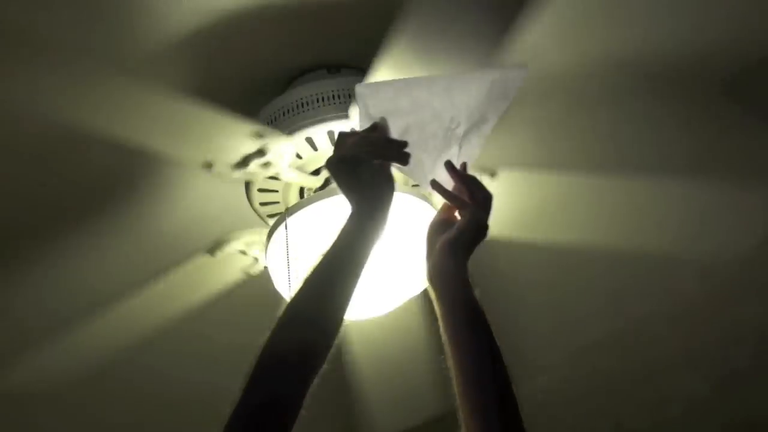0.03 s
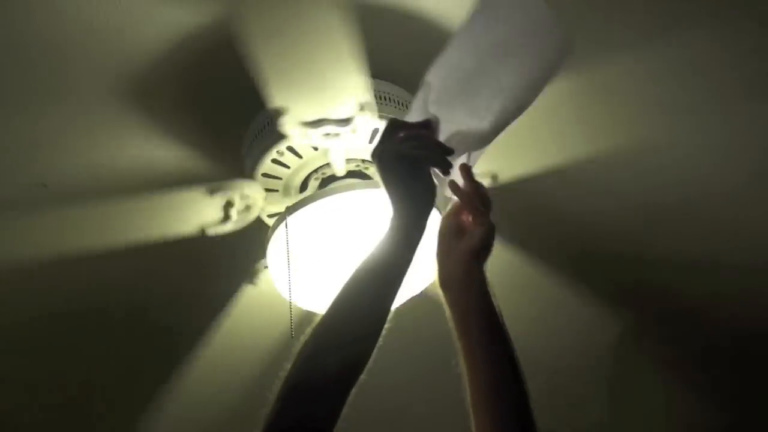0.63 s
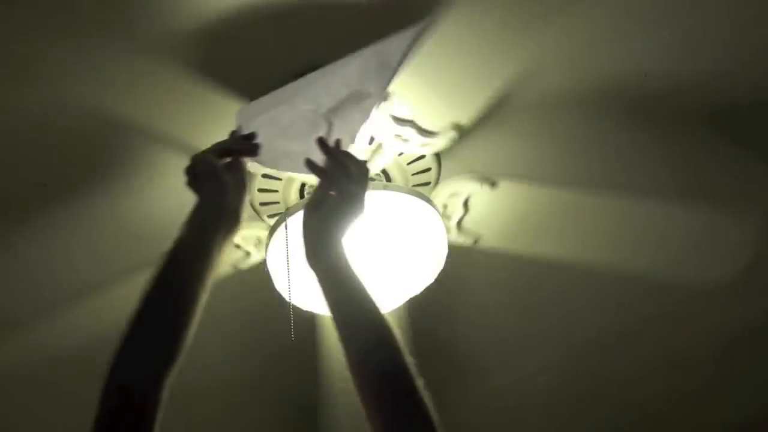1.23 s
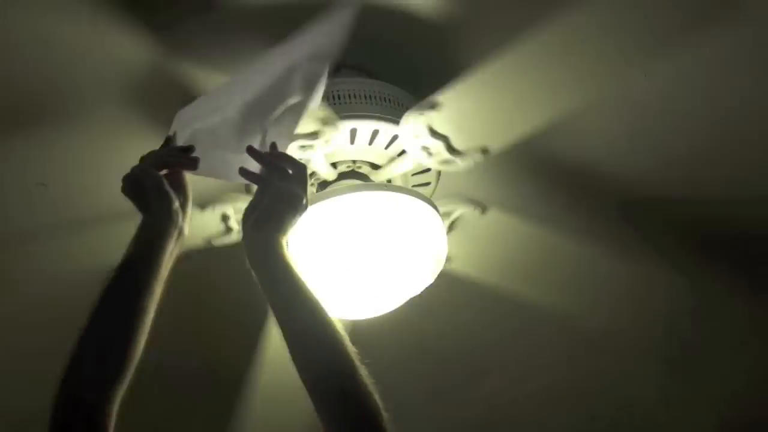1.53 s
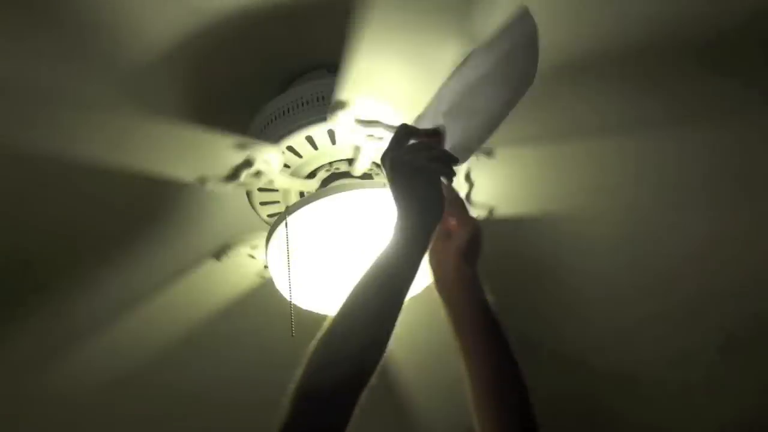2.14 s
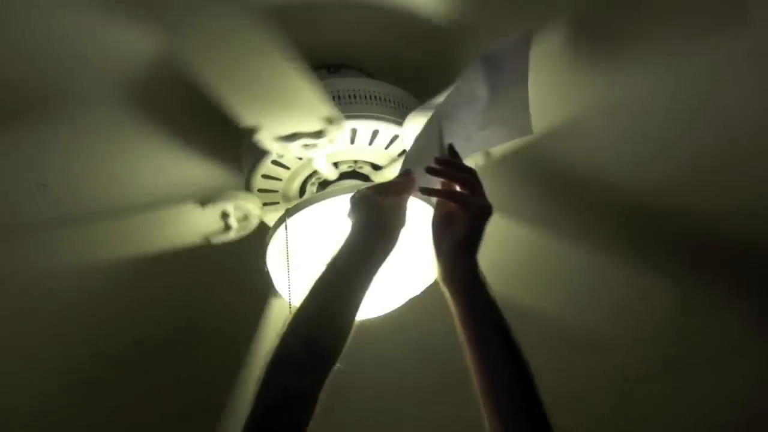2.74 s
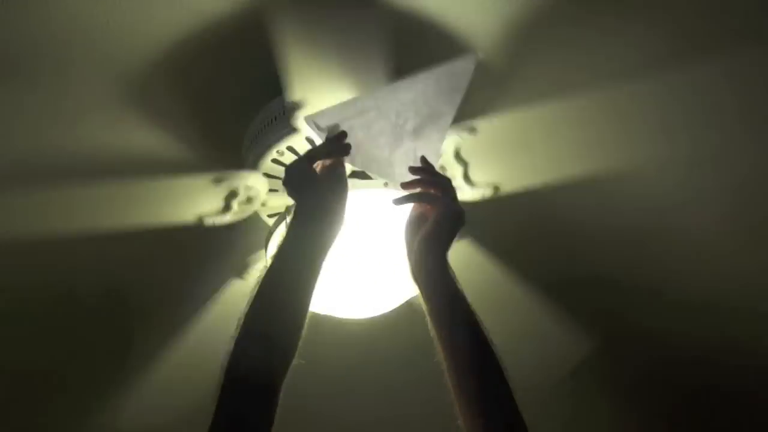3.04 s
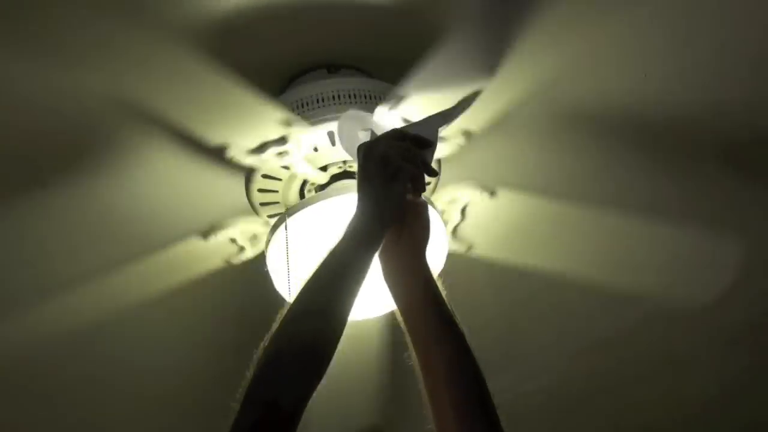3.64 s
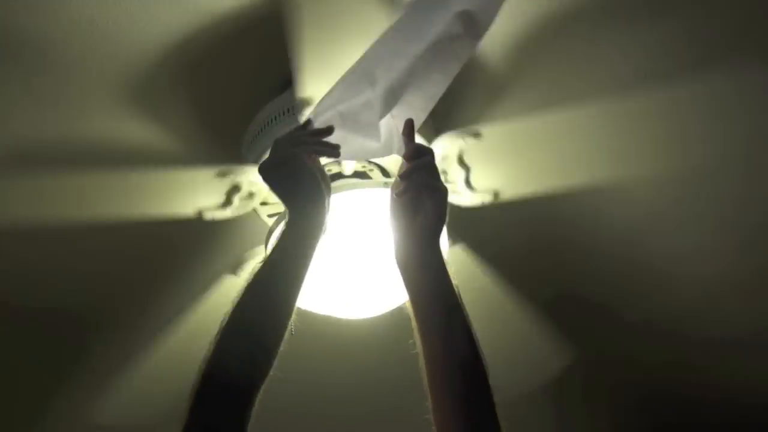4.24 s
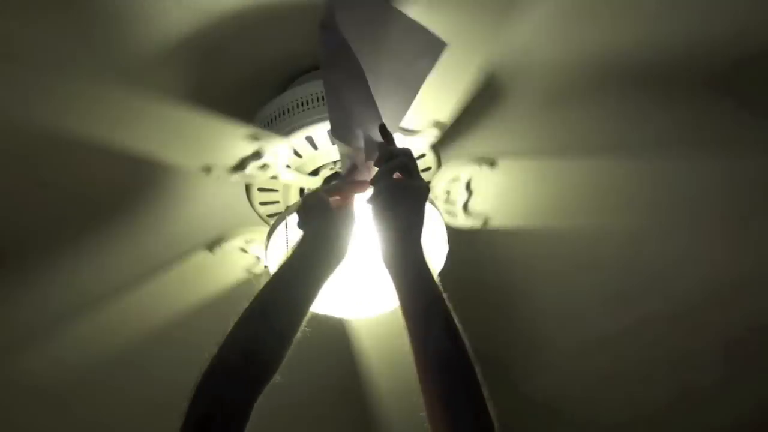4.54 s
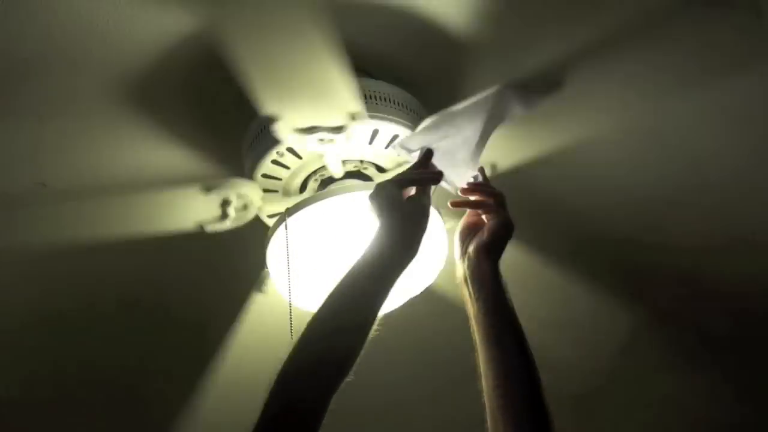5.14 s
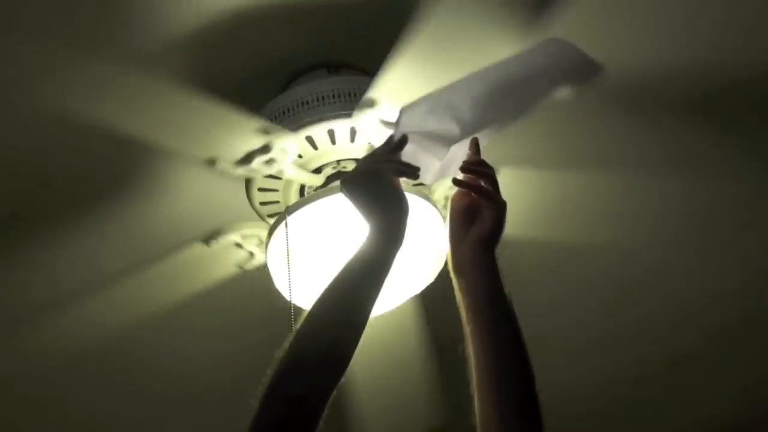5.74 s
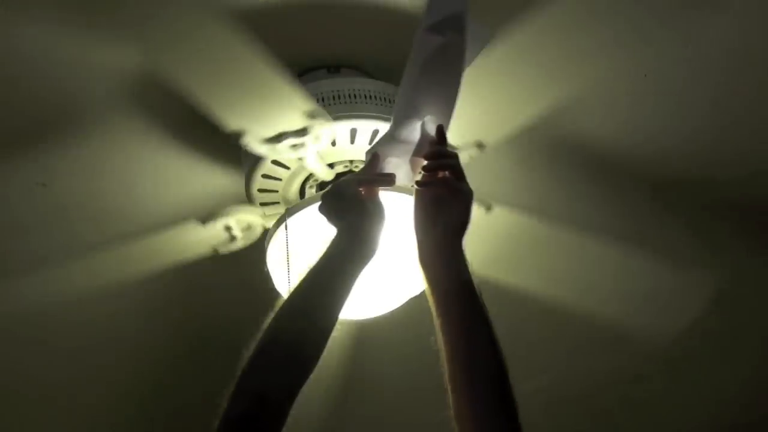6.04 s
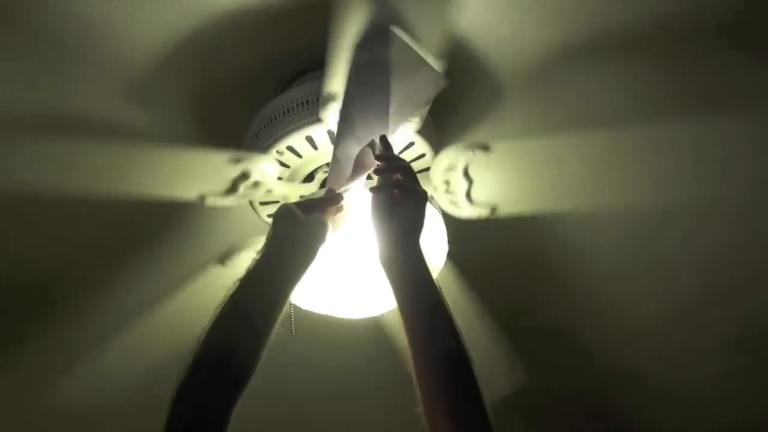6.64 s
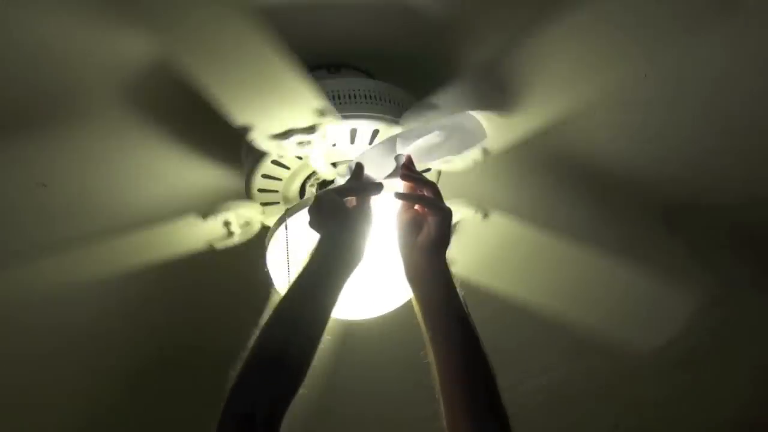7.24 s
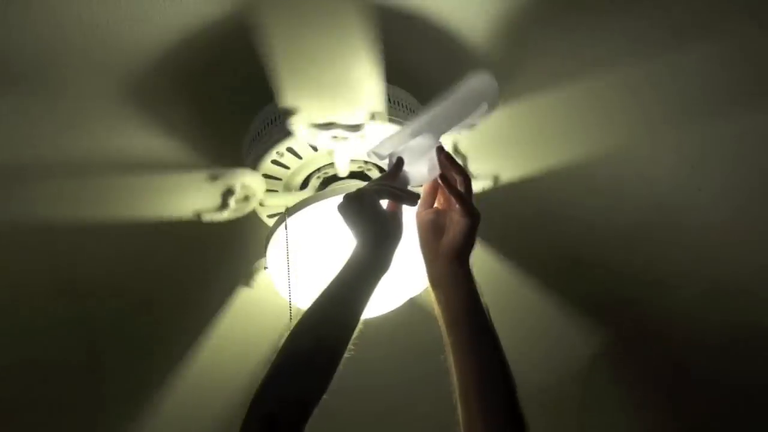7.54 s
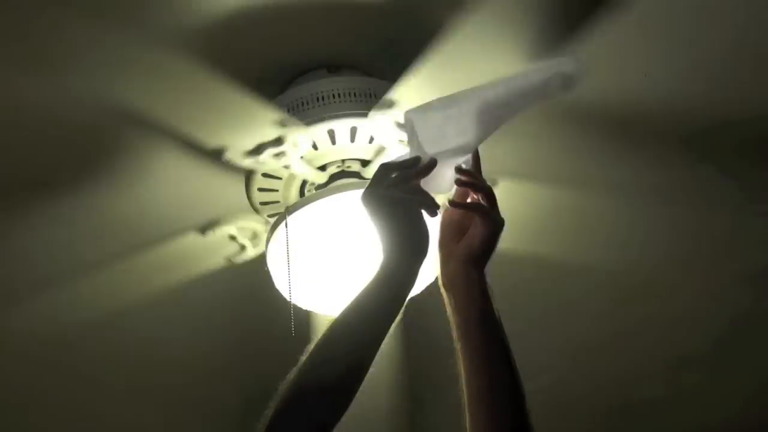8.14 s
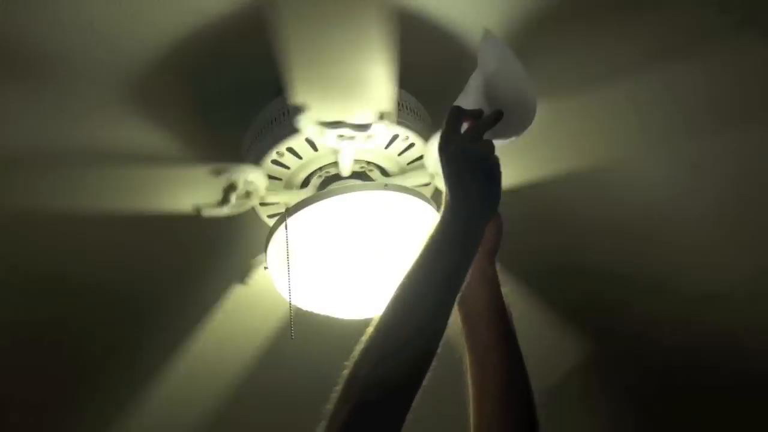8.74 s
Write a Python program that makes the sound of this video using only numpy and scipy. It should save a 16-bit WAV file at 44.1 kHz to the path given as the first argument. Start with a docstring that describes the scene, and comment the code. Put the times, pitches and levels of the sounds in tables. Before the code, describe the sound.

The blades of a spinning ceiling fan strike a sheet of paper four or five times a second. The sheet cracks, crackles and snaps free in an uneven clatter, sometimes rustling as it drags along the blades. Each slap is close and centred, with a short, bright echo from a small, bare room. A faint motor hum and soft wash of air lie underneath.

```python
"""A small, bare room, where a sheet of paper is held up into a spinning ceiling fan.
Four or five times a second a blade strikes it: the sheet cracks, buckles in a burst of crackles
and snaps free, or stays on the blades for a while and rustles. The microphone hears the nearest
patch of paper directly, dead centre; the room answers each slap with a short, bright, wider tail.
Underneath lie the low hum of the motor and the wash of air off the blades."""
import sys
import numpy as np
from scipy import signal
from scipy.fft import rfft, irfft, next_fast_len
from scipy.io import wavfile

SR = 44100
rng = np.random.default_rng(int(sys.argv[2]) if len(sys.argv) > 2 else 0)


def transcribe(u):
    """Save the signal u as a 16-bit wav file named by the first command-line argument.

    u: samples, shape (n,) or (channels, n), limited to [-1, 1]; the rate is SR.
    q: integer samples, one column per channel.
    """
    v = np.clip(np.atleast_2d(u).T, -1, 1)
    q = np.round(v * 32767).astype(np.int16)
    wavfile.write(sys.argv[1], SR, q)


N = 391608

# The fan motor's hum. Each row: frequency in Hz, rms level in dB that it wavers around.
MOTOR_HUM = [(48.4, -63.5), (60, -74), (134.6, -66.5)]
# Air moved by the blades. Each row: frequency in Hz, relative level in dB.
AIR_COLOUR = [(20, -22), (48, 2), (80, -2), (140, 2.5), (300, -1), (1000, -4.5), (3000, -4.5),
              (8000, -10.5), (16000, -21)]
# The part of that air which differs left to right. Each row: frequency in Hz, relative level in dB.
AIR_SIDE_COLOUR = [(20, -10), (60, -14), (150, -8), (1000, -2), (4000, -11), (16000, -41)]
# The bare room's decay. Each row: frequency in Hz, seconds to fall by 60 dB.
ROOM_DECAY = [(150, 0.41), (400, 0.4), (1000, 0.34), (2800, 0.34), (7300, 0.35), (14000, 0.29)]
# Width of the room sound at the microphone. Each row: frequency in Hz, side minus mid in dB.
ROOM_WIDTH = [(150, -22.5), (600, -14.5), (1500, -10), (3000, -9), (7200, -23), (10000, -5), (11200, -4),
              (11800, -40)]
# Colour of the crackling sheet. Each row: frequency in Hz, relative level in dB.
PAPER_COLOUR = [(50, -25), (100, -33.5), (160, -15.5), (240, -10.5), (300, -14), (370, -10), (1000, -1),
                (2100, 1.5), (4700, 0.5), (6800, -2), (9700, -11.5), (11800, -11), (14000, -20.5),
                (16000, -52)]
# Ring of the blades under a blow. Each row: frequency in Hz, bandwidth in Hz, relative level in dB.
BLADE_MODES = [(239, 7.9, -20), (375.5, 22, 0), (713, 18, -20), (1050, 6.9, -16), (1455, 9.4, -2),
               (2110, 27, -18), (2520, 15, -10)]
# The whole sheet flopping over. Each row: start in seconds, relative level in dB, pitch in Hz.
SHEET_FLOPS = [(0.787, -32, 200), (0.87, -30, 175), (0.909, -39, 205), (1.3, -34, 150), (1.325, -30, 175),
               (1.936, -33, 186), (2.115, -33, 180), (2.952, -35, 250), (3.584, -32, 190),
               (4.089, -39, 185), (5.08, -31, 223), (6.883, -29, 245)]
# Creases popping over. Each row: start in seconds, relative level in dB.
CREASE_POPS = [(1.5406, -21), (3.2813, -26.5), (3.428, -27), (4.109, -21.5), (4.3048, -21.5),
               (7.545, -29.5)]
# The sheet riding the blades. Each row: start and end in seconds, relative level in dB, treble in dB.
SHEET_DRAGS = [(0, 0.012, -30.5, -5), (0.184, 0.426, -42.5, 9), (0.466, 0.61, -52, -4),
               (0.851, 0.91, -32.5, 4), (1.424, 1.606, -42.5, 8.5), (1.6, 1.822, -40, 12),
               (1.871, 1.934, -36.5, -2), (2.132, 2.216, -48.5, 1), (2.989, 3.077, -41.5, 11),
               (3.149, 3.338, -34.5, 4), (3.48, 3.73, -35, -11), (3.848, 4.094, -45, -12),
               (4.139, 4.189, -28.5, 2.5), (4.87, 5.0, -34.5, 2.5), (5.13, 5.449, -36.5, 5.5),
               (5.479, 5.61, -43, 1), (6.726, 6.793, -35, 1), (6.992, 7.128, -35, 1),
               (7.222, 7.388, -37.5, 0), (7.425, 7.645, -42, 9.5), (7.749, 7.816, -33.5, 0),
               (7.895, 7.94, -41.5, 0), (8.048, 8.112, -37, 2), (8.256, 8.416, -39.5, -0.5)]
# A blade strikes the sheet and pushes it along until it snaps free of the trailing edge.
# Each row: start in seconds, strike level in dB, contact time in seconds, release level in dB,
# treble in dB, first crack in dB over the strike (low for a glancing blow). Levels are relative.
BLADE_BLOWS = [(0.0767, -21.5, 0.014, -21, 4, -5), (0.2453, -21.5, 0.089, -23, -8.5, -23.5),
               (0.427, -26, 0.012, -33, -3, -1), (0.5167, -32.5, 0.0084, -33, -12, 1.5),
               (0.6109, -17, 0.063, -22.5, -6.5, -16), (0.7873, -14.5, 0.018, -20.5, 4.5, -9.5),
               (0.983, -15, .063, -11.5, 2, -11.5), (1.207, -22, .012, -27, 4.5, -12),
               (1.3898, -27, 0.021, -34, 4.5, -16), (1.539, -17.5, 0.025, -19, -1, -19),
               (1.926, -21.5, 0.016, -16, 1.5, -22), (2.096, -33.5, .01, -44, -16, -8),
               (2.2398, -14.5, 0.063, -14, 5.5, -14.5), (2.4533, -18.5, 0.031, -16, -3, -11),
               (2.7461, -16, .01, -21, 4, -7.5), (2.9503, -15.5, .013, -21.5, -7, -10),
               (3.135, -19, .008, -25, -5, -11), (3.2708, -24.5, 0.0098, -30, -14, -7),
               (3.356, -27.5, .01, -34, -4, -9), (3.3815, -17.5, 0.042, -15.5, -3, -13),
               (3.568, -23, .034, -22.5, -6.5, -6), (3.694, -26, 0.014, -33.5, -5.5, -4),
               (3.8977, -27.5, 0.0095, -27, -1, -2), (3.964, -47, 0.011, -33.5, 0.5, 10.5),
               (4.0847, -18, 0.021, -19, 2.5, -1.5), (4.3054, -24, 0.032, -42, -0.5, -15),
               (4.5557, -20, 0.0073, -21, -2.5, -12), (4.775, -20, 0.023, -21, -3, -36),
               (5.0062, -30, 0.0074, -44, -37, -2), (5.073, -18, 0.042, -45, -4, -3.5),
               (5.2781, -18.5, 0.031, -15.5, -4.5, -20), (5.454, -24, .008, -36, -11, -9),
               (5.601, -21, .032, -14, -1.5, -16), (5.761, -16.5, 0.013, -26, -3.5, -7.5),
               (5.821, -18, .01, -26, -5.5, -10), (6.029, -28, 0.0096, -36, 0, -7),
               (6.424, -15.5, 0.024, -15.5, 3, -6.5), (6.6456, -18, 0.017, -29, -1.5, -13),
               (6.7963, -35.5, .008, -38, -9, 4), (6.843, -25.5, 0.007, -35, -14, -4),
               (6.8793, -16.5, .009, -21.5, 1, -5.5), (7.1676, -17.5, .055, -41, -3.5, -4),
               (7.379, -22.5, 0.037, -20, -16, -9), (7.545, -28, 0.0063, -33, 7, -6),
               (7.66, -16.5, 0.011, -24.5, -1.5, -8), (7.9332, -22, 0.026, -38, 2, -2.5),
               (8.1551, -19, 0.0078, -22.5, 5, -2), (8.315, -37, .006, -44, -24, -3),
               (8.403, -29, 0.0044, -36, -6, -3.5), (8.44, -22, 0.017, -18.5, -1.5, -20),
               (8.6605, -18, 0.047, -16.5, 1, -13)]

AIR_DB, AIR_SIDE_DB = -51, -7.5  # rms level of the air; its side signal against that
STRIKE_BODY_DB, RELEASE_BODY_DB = 2.5, -0.5  # the blade behind the sheet gives the strike more body
STRIKE_DIRECT_DB, RELEASE_DIRECT_DB = -5.5, -5  # direct sound against the room
STRIKE_SHARE, LONGEST_FADE_S = 0.43, 0.018  # a strike fades in this share of the contact, up to a limit
SQUARE_RISE_S, GLANCE = 0.00032, 1.27  # a square blow's rise; the fainter its crack, the slower the rise
CRACK_RISE_S, CRACK_FADE_S = 0.0004, 0.0045
RELEASE_RISE_S, RELEASE_FADE_S = 0.0014, 0.0038


def gain_of(db):
    return 10 ** (np.asarray(db) / 20)


def unit_rms(x):
    return x / np.sqrt(np.mean(x ** 2) + 1e-20)


def value_at(points, hz):
    """Reads a table along straight lines over log frequency."""
    table_hz, value = np.transpose(points)
    return np.interp(np.log(hz + 1), np.log(table_hz + 1), value)


def add(mix, start_s, sound):
    part = mix[max(round(start_s * SR), 0):][:len(sound)]
    part += sound[:len(part)]


def tint(x, points):
    """Colours a sound by rows of frequency in Hz and gain in dB."""
    size = next_fast_len(len(x) + 512)
    gain = gain_of(value_at(points, np.fft.rfftfreq(size, 1 / SR)))
    return irfft(rfft(x, size) * gain, size)[:len(x)]


def air_wash(db, colour):
    """The soft, steady noise of air stirred by the blades."""
    return gain_of(db) * unit_rms(tint(rng.standard_normal(N), colour))


def motor_hum(beat_s=2.12, trough_s=0.2, beat_db=3.5):
    """The motor overhead: wavering low tones, the lowest swelling and sinking in a slow beat."""
    t = np.arange(N) / SR
    knots = np.linspace(0, t[-1], 40)
    tones = []
    for hz, db in MOTOR_HUM:
        waver = np.interp(t, knots, rng.standard_normal(len(knots)))
        tones.append(np.sqrt(2) * gain_of(db + 1.5 * waver) * np.sin(2 * np.pi * hz * t + 0.4 * waver))
    beat = gain_of(-beat_db * np.cos(2 * np.pi * (t - trough_s) / beat_s))
    return beat * tones[0] + sum(tones[1:])


def room_tail(ceiling_s=0.0016, echoes_per_s=9000):
    """The near ceiling answers first, then the walls: random echoes, each band dying at its own speed."""
    t = np.arange(SR * 2 // 3) / SR
    echoes = rng.standard_normal(len(t)) * (rng.random(len(t)) < echoes_per_s / SR)
    hz, age, bands = signal.stft(echoes * (t > ceiling_s), SR, nperseg=256)
    decay = gain_of(-60 * age / value_at(ROOM_DECAY, hz)[:, None])
    tail = signal.istft(bands * decay, SR, nperseg=256)[1]
    return tail / np.linalg.norm(tail)


def flop_puffs(swell_s=0.0039, trim_db=-3):
    """A few low cycles of air pushed out by the flopping sheet."""
    out, t = np.zeros(N), np.arange(SR // 10) / SR
    envelope = t / swell_s * np.exp(1 - t / swell_s)
    for start, db, hz in SHEET_FLOPS:
        add(out, start, gain_of(db + trim_db) * envelope * np.sin(2 * np.pi * hz * t))
    return out


def crease_ticks(fade_s=0.00094, wall_delay_s=0.0053, wall_db=-7, trim_db=-2):
    """A crease pops: a thin, bright tick reaches the microphone, then its echo off the nearest wall."""
    out, t = np.zeros(N), np.arange(SR // 200) / SR
    for start, db in CREASE_POPS:
        tick = rng.standard_normal(len(t)) * np.exp(-t / fade_s)
        tick *= gain_of(db + trim_db) * np.sqrt(0.02 * SR) / np.linalg.norm(tick)
        add(out, start, tick)
        add(out, start + wall_delay_s, gain_of(wall_db) * tick)
    return tint(out, [(700, -2), (2500, -9.5), (6000, 1.5), (12000, 2)])


def sheet_ring(x):
    """Every click rings with the colour of the paper and, faintly, the modes of the blade."""
    hz = np.fft.rfftfreq(8192, 1 / SR)
    log_gain = np.log(gain_of(value_at(PAPER_COLOUR, hz)))
    mirrored = np.r_[log_gain, log_gain[-2:0:-1]]
    paper = np.exp(signal.hilbert(mirrored).conj())[:len(hz)]  # causal: no ring before the click
    blade = 1 + sum(gain_of(db) / (1 + 2j * (hz - mode_hz) / width) for mode_hz, width, db in BLADE_MODES)
    click = irfft(paper * blade)
    return signal.oaconvolve(x, click / np.linalg.norm(click))[:N]


def sheet_grip(catches_per_s=80, spread_db=3):
    """A juddering gain: the sheet catches on the blade and lets go."""
    catches = rng.standard_normal(catches_per_s * N // SR)
    position = np.linspace(0, len(catches), N)
    return unit_rms(gain_of(spread_db * np.interp(position, np.arange(len(catches)), catches)))


def crackle(samples, per_s, spread_db, hiss):
    """Tiny buckling clicks of uneven size over the hiss of rubbing fibres."""
    size = gain_of(spread_db * np.minimum(rng.exponential(1, samples), 4))
    clicks = size * rng.choice([-1, 1], samples) * (rng.random(samples) < per_s / SR)
    return unit_rms(clicks) + hiss * rng.standard_normal(samples)


def drag_rustle(grip, edge_s=0.0017, sag_db_per_s=9):
    """Loose crackles that swell and sink as the sheet catches and slides along a blade."""
    out = np.zeros(N)
    for start, end, db, treble_db in SHEET_DRAGS:
        t = np.arange(0, max(end - start, 2 * edge_s), 1 / SR)
        rustle = crackle(len(t), per_s=1200, spread_db=4, hiss=0.35)
        rustle *= np.clip(np.minimum(t, t[-1] - t) / edge_s, 0, 1)
        rustle *= gain_of(-sag_db_per_s * (t - t.mean()))  # sinks as the sheet slips off
        colour = [(400, 2.7), (1200, 1.5), (3300, -3), (8500, treble_db), (12000, treble_db + 3)]
        add(out, start, gain_of(db) * tint(rustle, colour))
    return out * grip


def slap(db, rise_s, fade_s, body_db, treble_db, bend_db, grip, judder=1.3):
    """A dense burst of crackles, clumped as the sheet catches and coloured by how it is bent."""
    t = np.arange(min(int((8 * fade_s + 0.005) * SR), len(grip))) / SR
    envelope = np.exp(-t / (2 * fade_s)) * (1 - np.exp(-t / rise_s))
    burst = crackle(len(t), per_s=6000, spread_db=3, hiss=0.67) * envelope * grip[:len(t)] ** judder
    burst *= np.sqrt(0.02 * SR / np.sum(burst ** 2))  # long or short, the energy of 20 ms at unit rms
    hz = np.geomspace(300, 12000, len(bend_db))
    colour_db = value_at([(600, body_db), (1400, 0), (3300, 0), (9500, treble_db)], hz) + bend_db
    return gain_of(db) * tint(burst, np.c_[hz, colour_db])


def edge_cracks(bends, grip):
    """The short, dry crack as a blade's leading edge first meets the sheet."""
    out = np.zeros(N)
    for (start, strike_db, _, _, treble_db, crack_db), bend_db in zip(BLADE_BLOWS, bends):
        crack = slap(strike_db + crack_db, CRACK_RISE_S, CRACK_FADE_S, STRIKE_BODY_DB,
                     treble_db, bend_db, grip[round(start * SR):])
        add(out, start - CRACK_RISE_S, crack)
    return out


def blade_slaps(bends, grip):
    """Each blow slaps twice, at strike and release; returns the direct sound and what fills the room."""
    direct, into_room = np.zeros((2, N))
    for (start, strike_db, contact_s, release_db, treble_db, crack_db), bend_db in zip(BLADE_BLOWS, bends):
        rise_s = SQUARE_RISE_S * gain_of(-GLANCE * crack_db)
        fade_s = min(STRIKE_SHARE * contact_s, LONGEST_FADE_S)
        catching = grip[round(start * SR):]
        strike = slap(strike_db, rise_s, fade_s, STRIKE_BODY_DB, treble_db, bend_db, catching)
        release = slap(release_db, RELEASE_RISE_S, RELEASE_FADE_S, RELEASE_BODY_DB,
                       treble_db - 0.5, bend_db, catching)  # a little duller than its strike
        add(direct, start, gain_of(STRIKE_DIRECT_DB) * strike)
        add(direct, start + contact_s, gain_of(RELEASE_DIRECT_DB) * release)
        add(into_room, start, strike)
        add(into_room, start + contact_s, release)
    return direct, into_room


def scene(patches=4):
    """Mid and side at the microphone: each patch of the sheet crackles by itself, with its own echoes."""
    bends = 1.3 * rng.standard_normal((len(BLADE_BLOWS), 16))  # broad resonances in dB, new every fold
    grip = sheet_grip()
    echoes = []
    for _ in range(patches):
        direct, into_room = blade_slaps(bends, grip)
        rustle = drag_rustle(grip)
        echoes.append(signal.oaconvolve(into_room + rustle, room_tail())[:N] / np.sqrt(patches))
    leftward, rightward = sum(echoes[::2]), sum(echoes[1::2])
    ticks, puffs, tail = crease_ticks(), flop_puffs(), room_tail()
    # the last patch is nearest the microphone and is also heard directly
    near_slaps = tint(direct + edge_cracks(bends, grip), [(1500, -1.53), (12000, -1.25)])
    near = near_slaps + gain_of(-3) * rustle + ticks
    far = leftward + rightward + gain_of(-5) * signal.oaconvolve(ticks, tail)[:N]
    flops = puffs + gain_of(-4) * signal.oaconvolve(puffs, tail)[:N]
    mid = sheet_ring(near + far) + flops + motor_hum() + air_wash(AIR_DB, AIR_COLOUR)
    room_side = tint(sheet_ring(leftward - rightward), ROOM_WIDTH)
    side = room_side + air_wash(AIR_DB + AIR_SIDE_DB, AIR_SIDE_COLOUR)
    return np.array([mid + side, mid - side])


def record(dry):
    """The recorder's band limit, at 16 kHz."""
    lowpass = signal.firwin(301, 16000, window=("kaiser", 9), fs=SR)
    return signal.oaconvolve(dry, lowpass[None], "same", axes=1)


dry = scene()
out = record(dry)
transcribe(out)
```